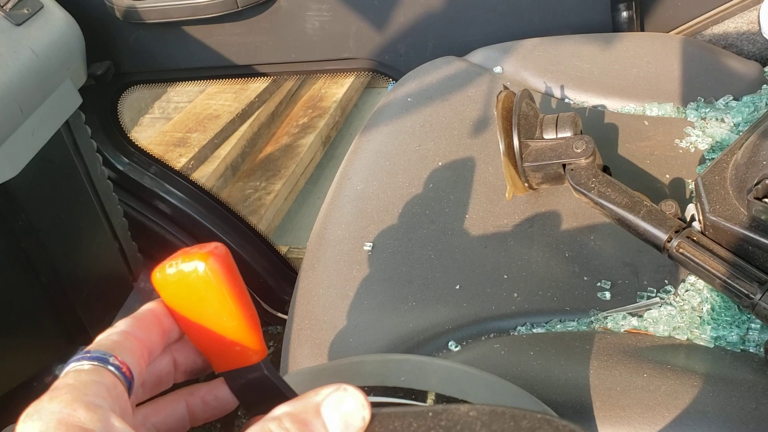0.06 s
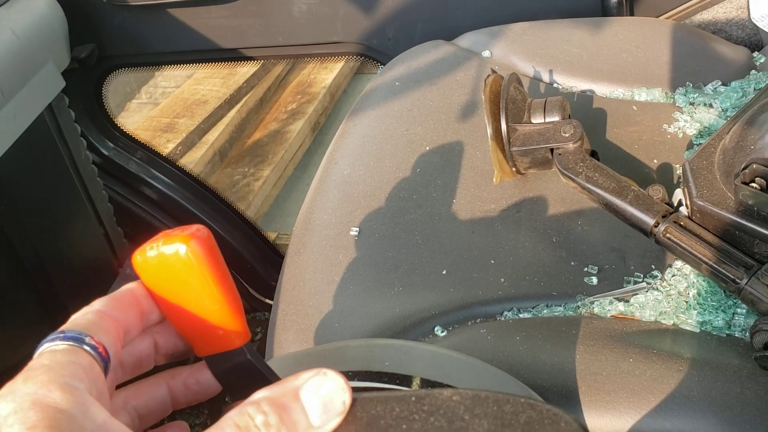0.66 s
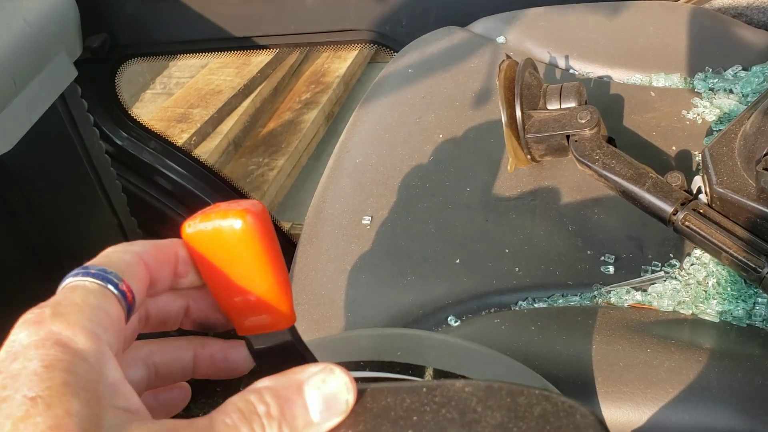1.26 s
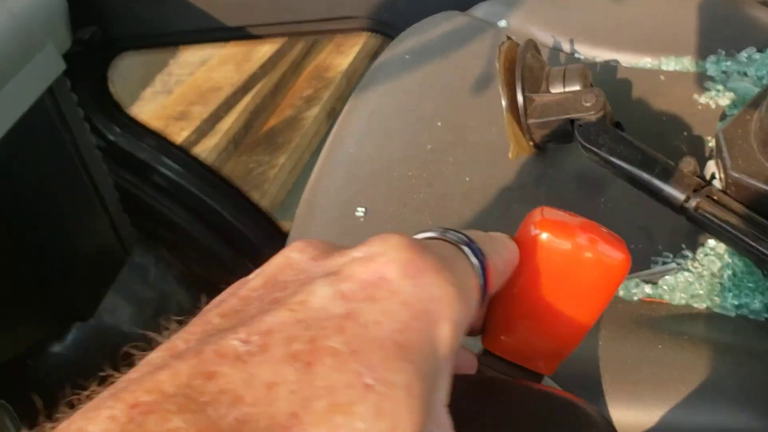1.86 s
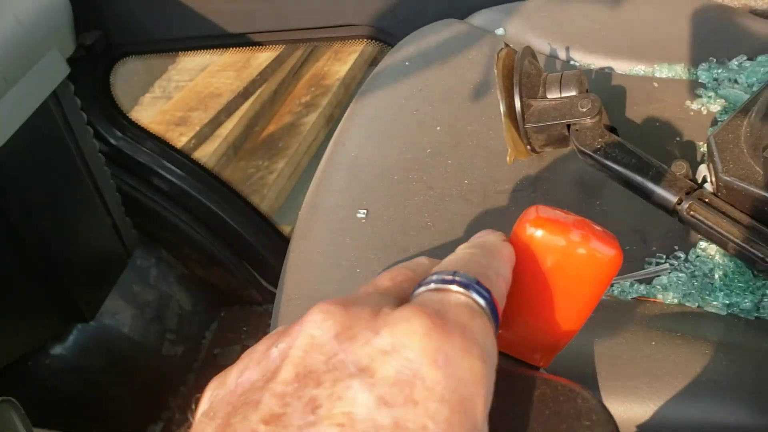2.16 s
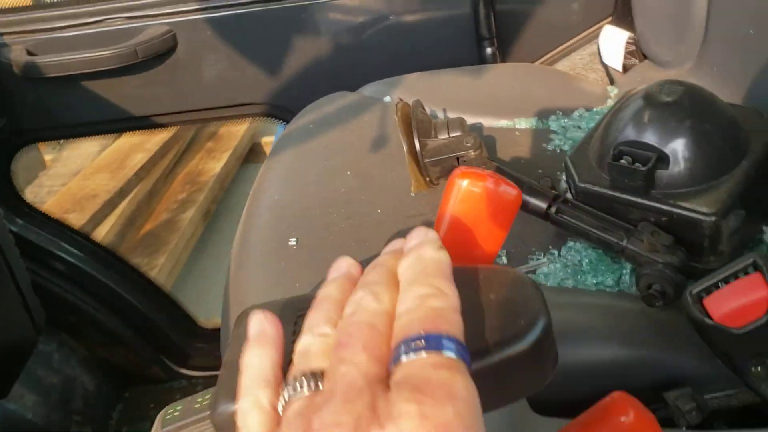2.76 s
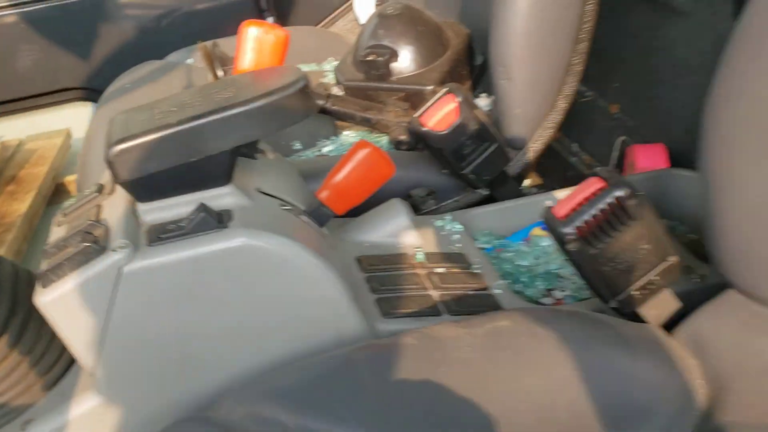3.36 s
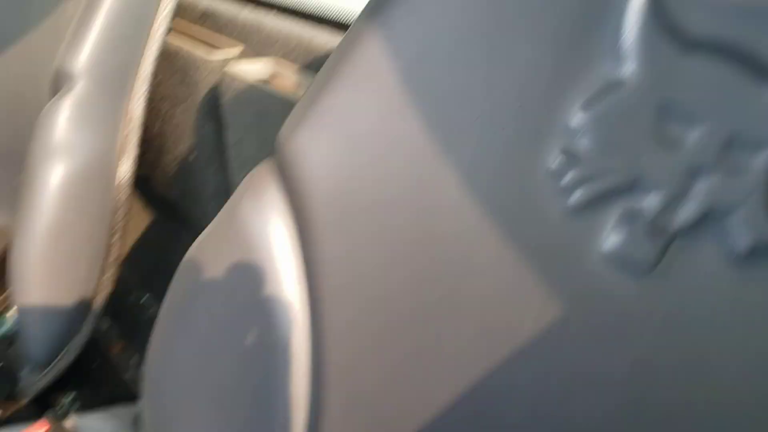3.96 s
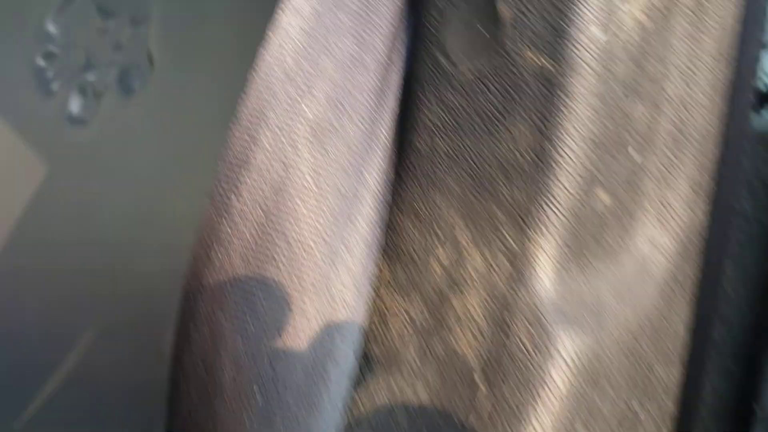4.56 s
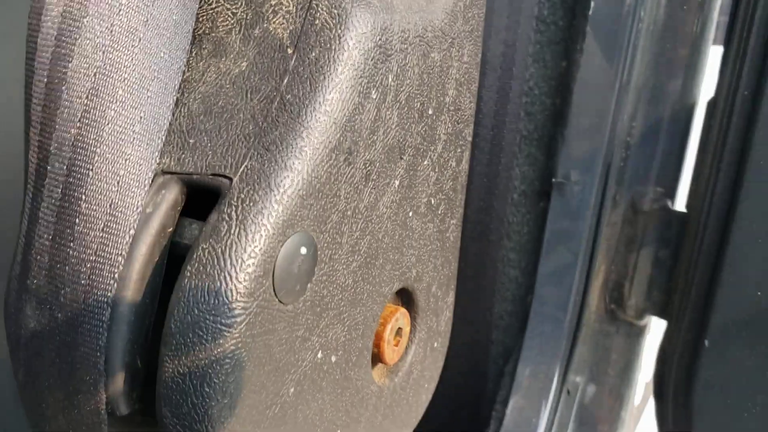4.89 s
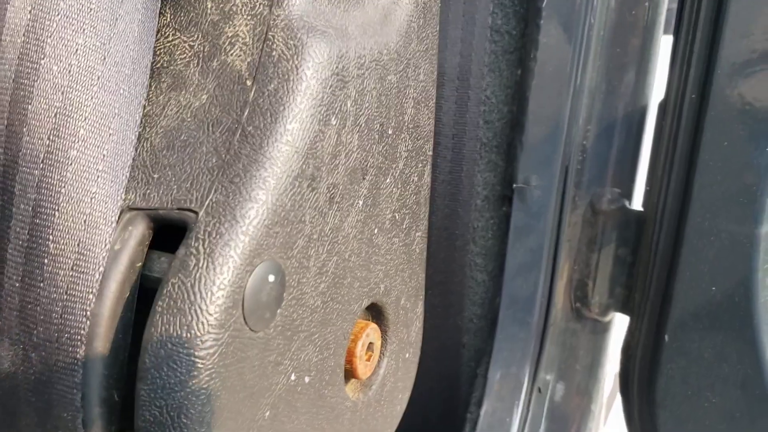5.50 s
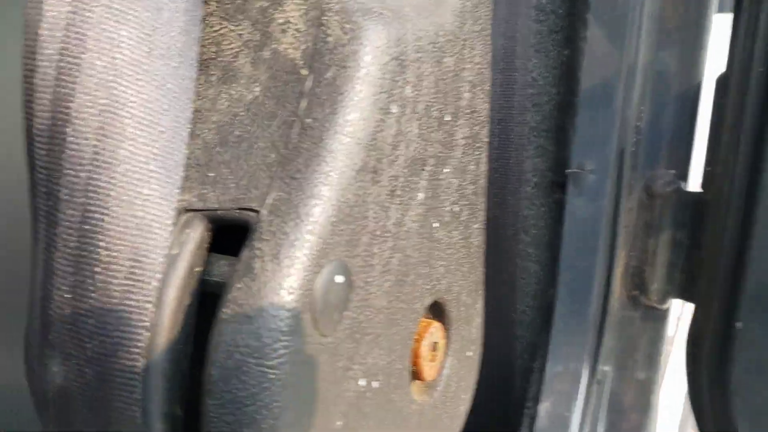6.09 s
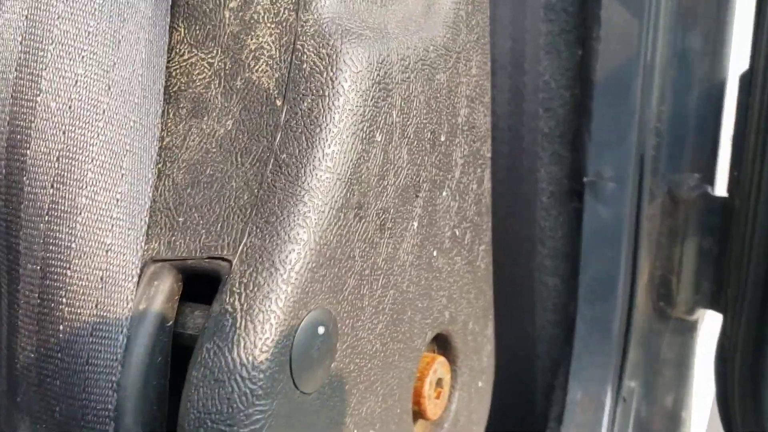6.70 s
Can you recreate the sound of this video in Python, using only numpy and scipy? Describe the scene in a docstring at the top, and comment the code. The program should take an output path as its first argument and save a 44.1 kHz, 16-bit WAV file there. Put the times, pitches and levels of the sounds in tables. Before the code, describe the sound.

Inside a machine cab, a throttle lever clicks back and the fast-running diesel engine winds down to a low, rattling idle.

```python
"""A small four-cylinder diesel drops from fast running to idle, heard from inside a work machine's cab.
The hand throttle is pulled back with a few clicks and the governor cuts the fuel until the engine
settles, with one slight swell. Firing orders boom in the cab, valve gear clatters behind the panels
and the cooling fan hums. Moving air hisses and buffets the handheld microphone as it is lowered
beside the seat, close to the engine cover."""
import sys
import numpy as np
from scipy import signal
from scipy.fft import rfft, irfft, next_fast_len
from scipy.io import wavfile

SR = 44100
rng = np.random.default_rng(int(sys.argv[2]) if len(sys.argv) > 2 else 0)


def to_wav(s):
    """Save 16-bit WAV."""
    ch = np.atleast_2d(s).T  # columns
    pcm = np.round(np.clip(ch, -1, 1) * 32767)  # PCM
    wavfile.write(sys.argv[1], SR, pcm.astype(np.int16))


N = 297234
TIME = np.arange(N) / SR
FFT_SIZE = next_fast_len(N, True)
FREQ = np.maximum(np.arange(FFT_SIZE // 2 + 1) * SR / FFT_SIZE, 1)
SIDES = np.array([[.5], [-.5]])  # splits a left-minus-right level between the channels
FAST_HZ, IDLE_HZ = 87, 40.7  # firing rates


def undb(db):
    """Decibels to gain."""
    return 10 ** (np.asarray(db) / 20)


def unit(x):
    """Scale so that the mean of the channels has rms 1."""
    return x / np.std(np.atleast_2d(x).mean(axis=0))


def curves(table):
    """The columns of a time table, sample by sample."""
    times, *columns = np.transpose(table)
    return [np.interp(TIME, times, column) for column in columns]


def spectrum(points):
    """Join points on a log-frequency axis."""
    hz, value = np.transpose(points)
    return np.interp(np.log(FREQ), np.log(hz), value)


def colour(x, db):
    """Filter by a gain for each frequency."""
    return irfft(rfft(x, FFT_SIZE) * undb(db), FFT_SIZE)[..., :N]


def walk(rate_hz):
    """Random values joined by ramps; spread near 1."""
    steps = 1.1 * rng.standard_normal(int(rate_hz * TIME[-1]) + 2)
    return np.interp(TIME * rate_hz, np.arange(len(steps)), steps)


def tone(turns):
    """A sine of rms 1."""
    return np.sqrt(2) * np.sin(2 * np.pi * turns)


def swells(table):
    """Summed gain of bell-shaped swells."""
    return sum(undb(db) * np.exp(-((TIME - centre) / half) ** 2) for centre, half, db in table)


def cab_stereo(pair, split_hz):
    """Two unrelated signals become alike for waves longer than the cab's fittings."""
    side = colour(pair[1], -20 * np.log10(1 + (split_hz / FREQ) ** 2))
    return np.array([pair[0] + side, pair[0] - side])


# thin whistles, far in the background:
# start_s, end_s, settled_hz, sharp_at_start_hz, rise_hz_per_firing_hz, level_db
WHISTLE_NOTES = [(0, 1.3, 12100, 302, 37.5, -70), (3.05, 6.747, 13600, 990, 300.4, -82)]

def whistles(firing_hz, closeness):
    """Likely oil squeezing through a hydraulic valve: notes start sharp, settle and follow pump speed."""
    settle_s, fade_s, waver_hz, close_db = .45, .039, 55, 8
    out = 0
    for start, end, settled_hz, sharp_hz, rise, db in WHISTLE_NOTES:
        faster_hz = firing_hz - np.interp(start, TIME, firing_hz)
        hz = settled_hz + sharp_hz * np.exp(-np.maximum(TIME - start, 0) / settle_s) + rise * faster_hz
        fade = np.clip(np.minimum(TIME - start, end - TIME) / fade_s, 0, 1)
        gain = fade * undb(db + 2 * walk(25.7))
        out = out + gain * tone(np.cumsum(hz + waver_hz * walk(300)) / SR)
    return out * undb(close_db * closeness)


# hiss in the cab and buffeting right on the microphone: frequency_hz, gain_db
HISS_SPECTRUM = [(4000, -29), (7000, 2.5), (9500, 8.5), (12000, -1), (16000, 1.5)]
BUFFET_SPECTRUM = [(25, 0), (70, 6.5), (160, -0.5), (290, -2.5), (390, -15.5), (700, -32), (1500, -39.5),
                   (5000, -45)]
# a hand or sleeve on the trim, and gusts on the microphone: centre_s, half_length_s, level_db
TRIM_RUBS = [(2.08, 0.086, -62), (2.77, 0.078, -60), (5.26, 0.073, -62), (5.55, 0.2, -57),
             (6.52, 0.067, -59), (6.69, 0.096, -55)]
MIC_GUSTS = [(5.62, 0.078, -28.5), (6.66, 0.1, -25)]

def air(hiss_db, draught_db):
    """Moving air and sliding hands hiss; the draught rumbles across the microphone."""
    hiss = unit(colour(rng.standard_normal((2, N)), spectrum(HISS_SPECTRUM)))
    eddies = cab_stereo(rng.standard_normal((2, N)), split_hz=390)
    buffet = unit(colour(eddies, spectrum(BUFFET_SPECTRUM)))
    hiss_gain = np.hypot(undb(hiss_db), swells(TRIM_RUBS)) * undb(.5 * walk(25))
    buffet_gain = np.hypot(undb(draught_db), swells(MIC_GUSTS)) * undb(1.1 * walk(25))
    return hiss * hiss_gain + buffet * buffet_gain


# sharp clicks and scuffs close by, plus a longer bright rattle as the engine swells:
# start_s, level_db, centre_hz, t60_s
CLICKS_AND_RATTLE = [(1.799, -38.5, 11160, 0.056), (1.8, -46.5, 1700, .07), (1.841, -46.5, 11300, .09),
                     (2.022, -52, 6980, .08), (2.0934, -45, 6810, .044), (2.2274, -34.5, 7000, 0.078),
                     (2.4357, -49, 12950, .05), (2.4642, -40.5, 835, 0.042), (2.776, -56, 9940, 0.036),
                     (2.824, -60, 11920, 0.026), (3.9111, -38, 3400, 0.0066), (3.91, -41, 690, 0.034),
                     (3.921, -55, 2440, 0.28), (5.19, -52, 12000, 0.091), (5.82, -49, 4540, 0.8),
                     (5.9, -47.5, 4482, 0.29), (6.475, -47, 12100, 0.099), (6.689, -44, 4025, .11),
                     (6.734, -28, 11400, 0.038)]

def clicks_and_rattle():
    """Bands of noise that start with a snap: short tails click or scuff, long ones rattle."""
    out = np.zeros((2, N))
    for start, db, hz, t60 in CLICKS_AND_RATTLE:
        age = np.maximum(TIME - start, 0)
        tail, snap = undb(-60 * age / t60), .39 * undb(-60 * age / .0054)
        band_db = -11 * np.abs(np.log2(FREQ / hz))
        noise = unit(colour(rng.standard_normal((2, N)), band_db))
        out += noise * (TIME >= start) * (tail + snap) * undb(db - 3)
    return out


# cab resonances acting on the cooling fan's notes: frequency_hz, gain_db
FAN_IN_CAB = [(300, -2.5), (340, -14), (420, -13), (470, 2.5), (570, 6), (592, 3), (635, -1.5)]

def cooling_fan(firings, firing_hz, fan_db):
    """The belt-driven fan follows the engine, humming at its blade rate and the octave above."""
    blades_per_firing, octave_db = 7.285, -15
    blades = blades_per_firing * firings + .15 * walk(13)
    out = 0
    for k, db in ((1, .011), (2, octave_db)):
        cab_db = np.interp(k * blades_per_firing * firing_hz, *np.transpose(FAN_IN_CAB))
        out = out + undb(fan_db + db + cab_db + 2 * walk(15)) * tone(k * blades)
    return out


# low hum around the seat: time_s, pitch_hz, level_db
BLOWER_HUM = [(0, 71.08, -38.5), (1.3, 73, -27.5), (2.45, 74.5, -28.5), (4.5, 74.1, -40.5),
              (6.74, 73.73, -30)]

def blower():
    """Likely the cab blower: it holds a nearly steady speed and beats with the engine's notes."""
    hz, db = curves(BLOWER_HUM)
    return undb(db + 3.1 * walk(19)) * tone(np.cumsum(hz + .87 * walk(11)) / SR)


def knocks(firings, jitter_s, scatter_db, t60_s, count=64):
    """Valves, injectors and gears ring the block at the same crank angles in each four-firing cycle."""
    cycles = firings / 4
    angles = (np.arange(count) + rng.random(count)) / count
    strengths = np.tanh(2 * rng.standard_normal(count))
    strike_cycles = np.arange(int(cycles[-1]) + 1)[:, None] + angles
    strike_s = np.interp(strike_cycles, cycles, TIME, right=2 * TIME[-1])
    at = ((strike_s + jitter_s * rng.standard_normal(strike_s.shape)) * SR).astype(int)
    blows = strengths * undb(scatter_db * rng.standard_normal(at.shape))
    inside = (at >= 0) & (at < N)
    train = np.bincount(at[inside], blows[inside], N)
    # countless overlapping modes smear each blow in time and favour no pitch
    age = TIME[:SR // 10]
    ring = rfft(rng.standard_normal((2, len(age))) * undb(-60 * age / t60_s), FFT_SIZE)
    rung = irfft(rfft(train, FFT_SIZE) * ring / np.abs(ring), FFT_SIZE)[:, :N]
    return unit(rung / np.sqrt(np.gradient(firings)))  # equal power at any speed


# clatter as it reaches the seat through the panels: frequency_hz, gain_db
CLATTER_SPECTRUM = [(250, 3.5), (480, 5.5), (700, 0.5), (1000, -0.5), (1400, -4.5), (1900, -8.5),
                    (2400, -11.5), (3500, -15), (5500, -13), (7500, -22), (11000, -20.5), (16000, -14.5)]
# how far each band leans to one side of the microphone: frequency_hz, weight
CLATTER_LEAN = [(700, 0), (1300, 0.44), (2400, 0.8), (4400, 2.03), (9000, 0)]
# ringing panels and covers: pitch_hz, width_hz, gain_db
PANEL_MODES = [(853, 32, 14), (1155, 50, 5), (1574, 44, 11), (1750, 75, 13.5)]

def clatter(firings, clatter_db, covers_db, lean_db):
    """Metal knocks and a rasp of combustion at each firing, heard through the panels."""
    rasp = rng.standard_normal((2, N)) * (1 + .24 * np.cos(2 * np.pi * firings))
    metal = knocks(firings, jitter_s=.00007, scatter_db=2.5, t60_s=.042)
    blows = cab_stereo(metal + undb(-3.5) * unit(rasp), split_hz=90)
    through_db = spectrum(CLATTER_SPECTRUM) + SIDES * lean_db.mean() * spectrum(CLATTER_LEAN)
    # the covers are shaken hardest once a crank turn
    shaken = blows * (1 + .28 * np.cos(np.pi * firings))
    modes = sum(undb(db) / (1 + 2j * (FREQ - hz) / width) for hz, width, db in PANEL_MODES)
    ringing = irfft(rfft(shaken, FFT_SIZE) * modes * undb(through_db), FFT_SIZE)[:, :N]
    sound = unit(colour(blows, through_db) + undb(covers_db) * ringing)
    return sound * undb(clatter_db + 2.5 + SIDES * (lean_db - lean_db.mean()))


# thudding from underfoot: frequency_hz, gain_db
FLOOR_SPECTRUM = [(20, -15), (35, -10.5), (60, 7.5), (100, 1.5), (150, 3.5), (205, -2.5), (260, 4),
                  (330, -0.5), (400, -7), (560, -6.5), (720, -21.5), (1200, -40)]

def drone(firings, drone_db):
    """Dull, uneven thuds come through the mounts and floor, over a deep sway between the two sides."""
    lean_db, sway_db = -3.2, -47.5
    thuds = knocks(firings, jitter_s=.0007, scatter_db=4, t60_s=.088)
    body = unit(colour(cab_stereo(thuds, split_hz=830), spectrum(FLOOR_SPECTRUM)))
    sway_spectrum = spectrum([(20, 3), (45, 9), (130, 4), (300, -8), (600, -51)])
    sway = unit(colour(rng.standard_normal(N), sway_spectrum))
    return body * undb(drone_db + SIDES * lean_db) + undb(sway_db) * np.array([sway, -sway])


# the cab booming all around the microphone: firing_hz, gain_db
CAB_BOOM = [(41, -25.5), (43, -17.5), (48, -12), (54, -8.5), (68, 2.5), (81, -14), (87, -20)]
# engine notes at the seat when fast, slowing and idling: multiple_of_firing_rate, level_db
FAST_NOTES = [(.5, -31.5), (1.5, -44.5), (2, -45.5), (2.25, -45.5), (2.75, -44), (3, -35.5), (3.25, -41),
              (3.5, -46.5), (3.75, -50), (4, -43), (5, -53), (5.5, -53), (6.5, -54), (13.7, -62),
              (17, -73.5), (20, -61.5), (25, -72)]
SLOWING_NOTES = [(2, -37.5), (3, -49.5), (4, -42.5), (5, -52)]
IDLE_NOTES = [(2, -32.5), (3, -31), (4, -42), (5, -47.5), (6, -59), (7, -60), (8, -51), (9.5, -57),
              (12, -54)]

def engine_orders(firings, firing_hz, fuel, drone_db):
    """Clean notes locked to the crank; each set rings the cab only near its own engine speed."""
    fast_width_hz, idle_width_hz, shudder_db = 7.5, 1.14, 4
    balance_fuel = .17  # here gas force cancels piston inertia and the boom drops out
    cab_db = np.interp(firing_hz, *np.transpose(CAB_BOOM))
    boom = (fuel - balance_fuel) * undb(cab_db + .5 * walk(22.43)) * tone(firings)
    slowing = sum(undb(db + shudder_db * walk(13)) * tone(k * firings) for k, db in SLOWING_NOTES)
    fast = sum(undb(db + 1.1 * walk(17.3)) * tone(k * firings + rng.random()) for k, db in FAST_NOTES)
    # at idle all orders rise together: one steep pressure step a firing, its top growing with the drone
    idle = 0
    for k, db in IDLE_NOTES:
        lift_db = (drone_db + 37) * np.interp(k, [2, 4], [0, .8])
        idle = idle + undb(db + 1.78 * walk(18) + lift_db) * tone(k * firings)
    slowing_share = np.interp(firing_hz, [IDLE_HZ, 52, 66, FAST_HZ], [0, 1, 1, 0])
    fast_share = 1 / (1 + ((firing_hz - FAST_HZ) / fast_width_hz) ** 2)
    idle_share = 1 / (1 + ((firing_hz - IDLE_HZ) / idle_width_hz) ** 2)
    notes = boom + slowing_share * slowing + fast_share * fast + idle_share * idle
    lean_db = spectrum([(100, 2), (200, -.5), (400, -4.5), (700, 26), (1700, -8)])
    return colour(notes, SIDES * lean_db)


# speed asked of the governor, eased back, pulled to idle, one slight swell: time_s, firing_hz
HAND_THROTTLE = [(0, 87.4), (1.183, 86.9), (1.26, 80.6), (1.5, 81), (1.81, 54.6), (1.955, 47.6),
                 (2.185, 45), (2.215, 42.2), (2.38, 41.9), (2.52, 40.6), (5.1, 40.9), (5.6, 39.9),
                 (5.84, 42.6), (6.07, 40.3), (6.74, 40.6)]

def governor():
    """Fuel follows the lack of speed a little late; the flywheel follows the fuel (1 holds the speed)."""
    gain, lag_s, drag_per_s = 23, .036, 1.34
    step = 200  # samples
    asked = curves(HAND_THROTTLE)[0][::step]
    firing_hz, fuel, states = asked[0], 1, []
    for wanted_hz in asked:
        wanted_fuel = max(1 + gain * (wanted_hz / firing_hz - 1), 0)
        fuel += (wanted_fuel - fuel) * step / SR / lag_s
        firing_hz += firing_hz * drag_per_s * (fuel - 1) * step / SR
        states.append((firing_hz, fuel))
    return curves(np.column_stack([TIME[::step], states]))


# the microphone is lowered beside the seat, 1 being nearest the engine cover: time_s, closeness
MIC_PATH = [(0, 0), (3.6, 0.14), (4.35, 0.11), (4.72, 0.83), (6.74, 1)]
# how each layer's gain moves: idle_db, db_per_speed_doubling, db_per_extra_fuel, close_to_cover_db
DRONE_LAW = (-45.5, 5, -3.5, 5.5)
CLATTER_LAW = (-57.5, 10.5, 2.5, 4.5)
COVERS_LAW = (-10.5, -7, 2, 6.5)
FAN_LAW = (-50, -0.5, -2.5, 2)
HISS_LAW = (-68.5, 13, 1.5, 2.5)
DRAUGHT_LAW = (-61.5, -5, -3, 27)

def scene():
    """One crank drives every part of the engine; speed, fuel and microphone distance set the balance."""
    firing_hz, fuel = governor()
    closeness, = curves(MIC_PATH)
    firings = np.cumsum(firing_hz + .12 * walk(16)) / SR
    state = np.column_stack([np.ones(N), np.log2(firing_hz / IDLE_HZ), fuel - 1, closeness])
    drone_db = state @ DRONE_LAW
    engine = engine_orders(firings, firing_hz, fuel, drone_db) + drone(firings, drone_db)
    lean_db = -3.5 - 6.5 * closeness  # the clatter moves further right near the cover
    metal = clatter(firings, state @ CLATTER_LAW, state @ COVERS_LAW, lean_db)
    fans = cooling_fan(firings, firing_hz, state @ FAN_LAW) + blower()
    draught = air(state @ HISS_LAW, state @ DRAUGHT_LAW)
    return engine + metal + fans + draught + whistles(firing_hz, closeness) + clicks_and_rattle()


# the microphone's ports, a notch below their resonance: frequency_hz, left_db, right_db
MIC_PORTS = [(2690, -0.5, 1.5), (5400, -12.5, -4), (7360, -16, 0), (8180, -20, -14), (9000, -7.5, -14),
             (9510, -2.5, -6.5), (11570, 10, 9), (12860, -6, -0.5), (15800, -10, -2.5)]

def record(dry):
    """The handheld microphone's ports colour the treble, and the top is cut."""
    left_db = spectrum([(hz, left) for hz, left, _ in MIC_PORTS])
    right_db = spectrum([(hz, right) for hz, _, right in MIC_PORTS])
    top_hz = 15850
    lowpass = signal.ellip(10, .2, 80, top_hz, fs=SR, output="sos")
    return signal.sosfilt(lowpass, colour(dry, [left_db, right_db]))


dry = scene()
out = record(dry)
to_wav(out)
```